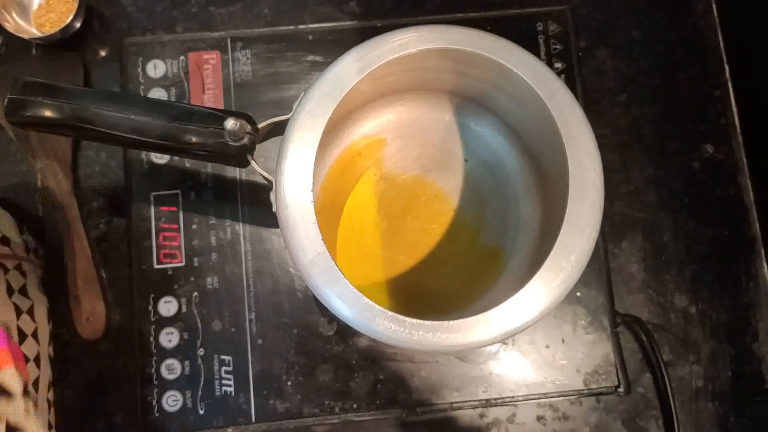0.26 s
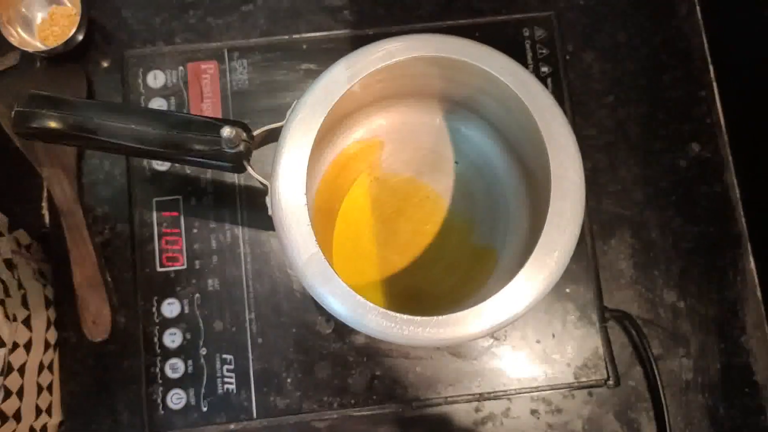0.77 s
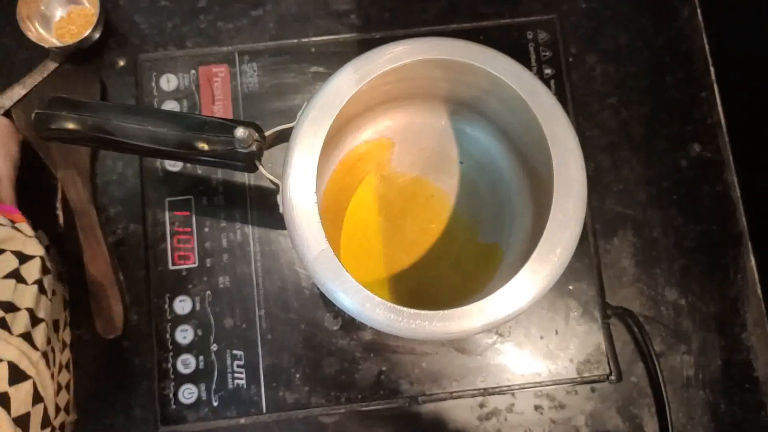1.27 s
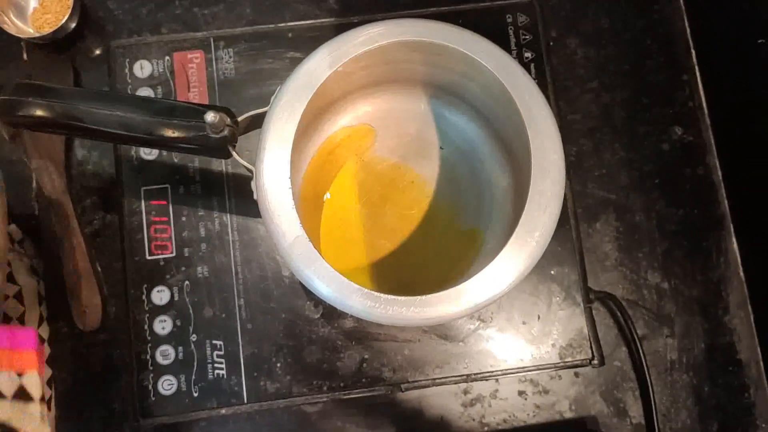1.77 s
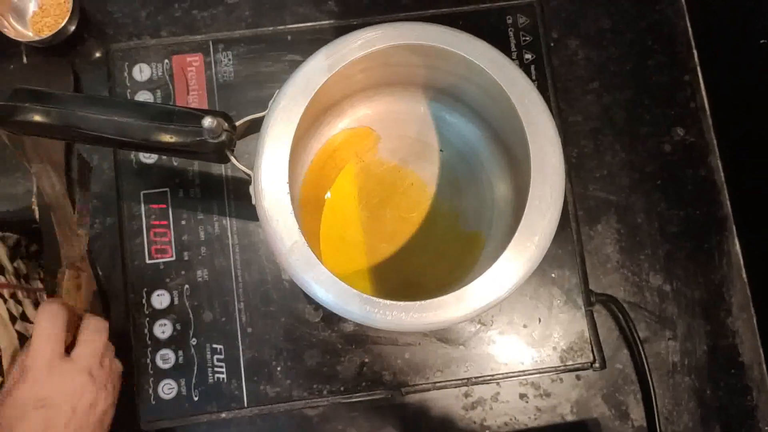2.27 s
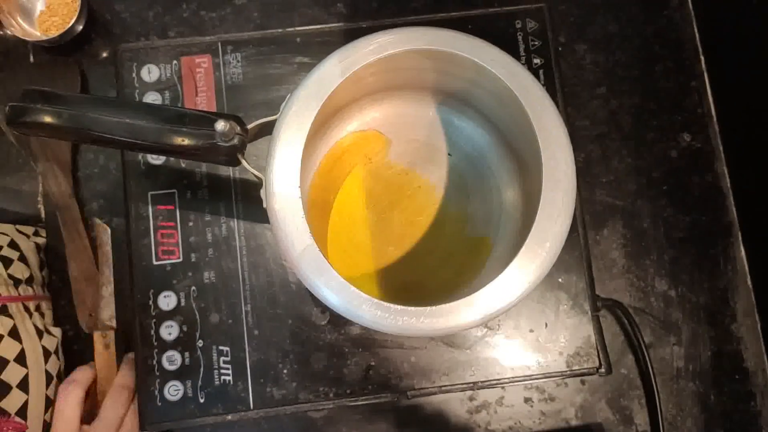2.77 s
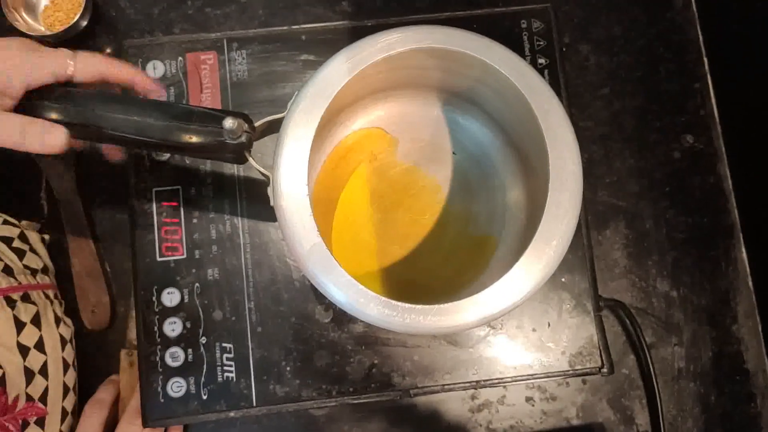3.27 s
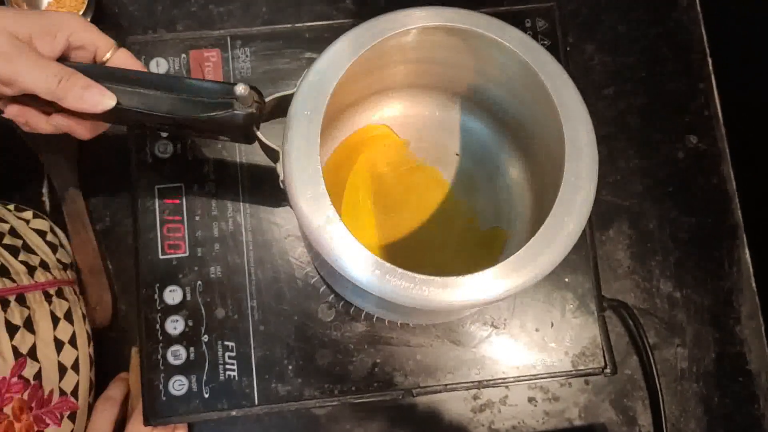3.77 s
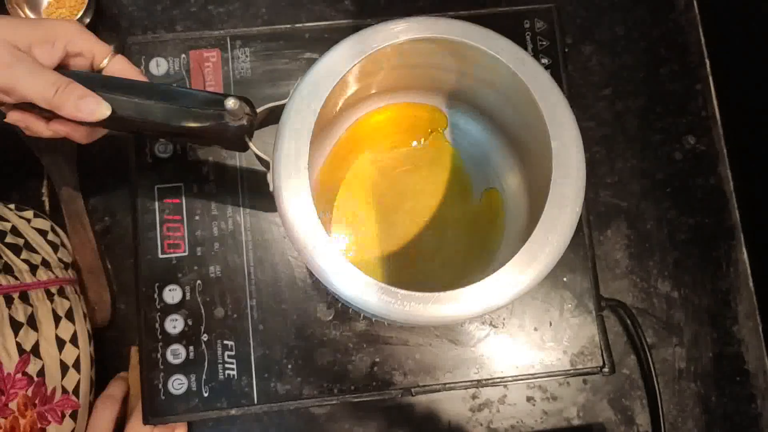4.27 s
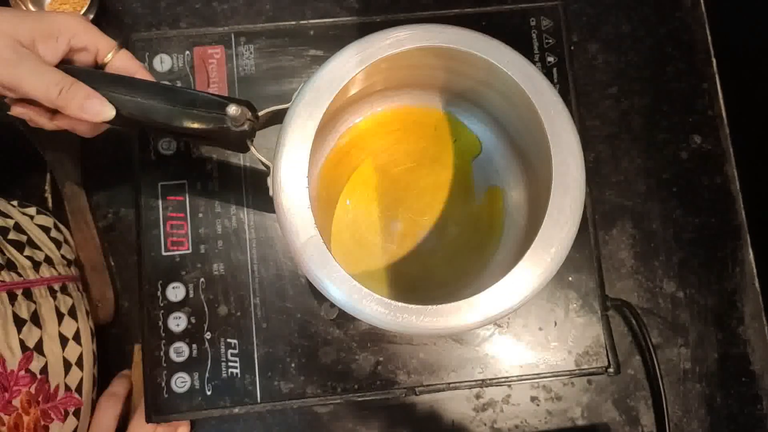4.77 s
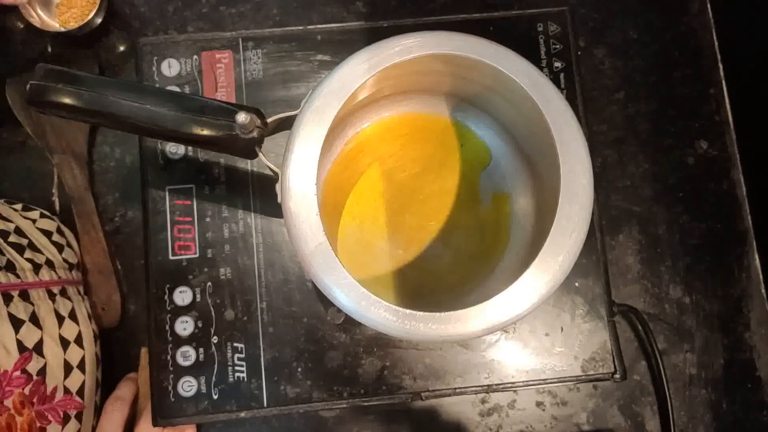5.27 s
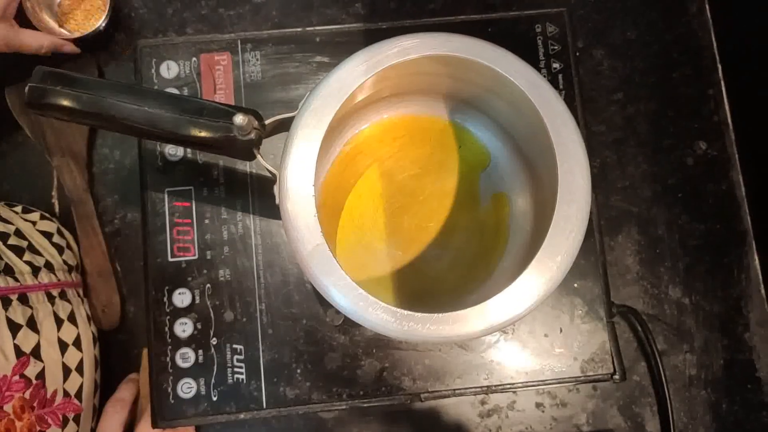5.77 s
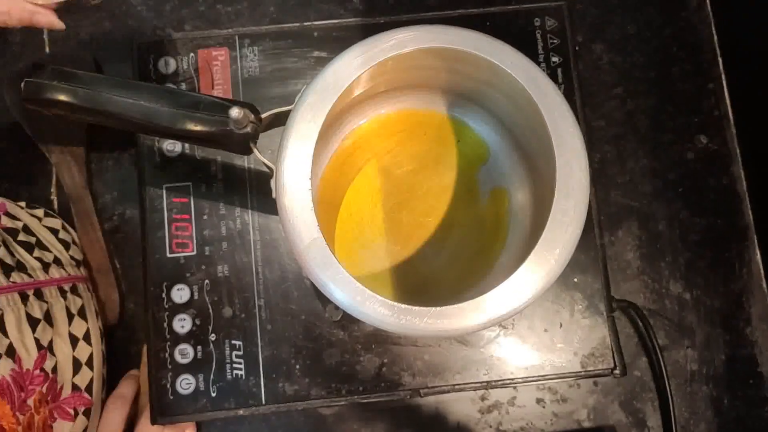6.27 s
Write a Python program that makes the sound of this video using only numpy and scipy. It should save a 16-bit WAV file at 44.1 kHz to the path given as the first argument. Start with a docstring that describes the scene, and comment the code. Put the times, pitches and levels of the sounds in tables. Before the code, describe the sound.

In a small kitchen, an induction cooktop's fan drones over a low electrical hum and a faint, high sizzle from a pressure cooker. A utensil scrapes and tinkles, something knocks hard on the counter, and a steel knife rattles. The cooker's handle clicks, then its base taps the glass. The sizzle drops out for a second and returns with another tap. Everything sounds close, with a short room echo.

```python
"""Pressure cooker on an induction cooktop

In a small kitchen a fan drones, the mains hum, and the coil shakes a cooker of oil into a fine sizzle.
Utensils clink and knock on the counter, and a knife is moved aside. A hand grips the cooker's handle
and tilts it; the sizzle all but stops until the base is set back on the glass."""
import sys
import numpy as np
from scipy import signal
from scipy.fft import rfft, irfft
from scipy.io import wavfile

SR = 44100
rng = np.random.default_rng(int(sys.argv[2]) if len(sys.argv) > 2 else 0)


def dump_mix(stems):
    """Bounce the given channels to the path in sys.argv[1] as a 16-bit WAV at rate SR."""
    frames = np.atleast_2d(stems).T  # one column per channel
    limited = np.clip(frames, -1, 1)  # hard clip at full scale
    pcm = np.round(limited * 32767).astype(np.int16)
    wavfile.write(sys.argv[1], SR, pcm)


N = 287973
TIME, FREQ = np.arange(N) / SR, np.fft.rfftfreq(N, 1 / SR)
MAINS_HZ = 50


def amp(db):
    """Turns decibels into a gain."""
    return 10 ** (np.asarray(db) / 20)


def unit(x):
    """Scales a signal to an average (rms) size of 1."""
    return x / np.sqrt(np.mean(x ** 2) + 1e-20)


def read(points, hz):
    """Looks up a table by frequency, with octaves evenly spaced."""
    f, value = np.transpose(points)
    return np.interp(np.log(hz + 1), np.log(f), value)


def curve(rows):
    """Joins (time, value) points with straight lines."""
    return np.interp(TIME, *np.transpose(rows))


def add(mix, s, sound):
    """Mixes a stereo sound in, starting at s seconds."""
    part = mix[:, round(s * SR):][:, :sound.shape[1]]
    part += sound[:, :part.shape[1]]


def pan(x, left_db):
    """Leans a sound to the left."""
    return x * amp([[left_db / 2], [-left_db / 2]])


def drift(rate_hz):
    """Random wandering, mostly slower than rate_hz."""
    return unit(irfft(rfft(rng.standard_normal(N)) / (1 + (FREQ / rate_hz) ** 2), N))


def bell(hz, width):
    """The bell-shaped peak of a resonance around hz."""
    return 1 / np.sqrt(1 + (2 * (FREQ - hz) / width) ** 2)


def colour(x, points, size=2048):
    """Shapes lows and highs; nothing rings ahead of a hit, so it stays sharp."""
    log_gain = np.log(amp(read(points, abs(np.fft.fftfreq(size, 1 / SR)))))
    taps = np.fft.ifft(np.exp(np.conj(signal.hilbert(log_gain)))).real
    return signal.oaconvolve(x, taps[None, :size // 2], axes=1)[:, :N]


def tone(turns, db, unsteady, flutter_hz=7):
    """A tone that flutters in level and pitch; turns counts its cycles."""
    flutter = 1 + unsteady * (drift(flutter_hz) + 1j * drift(flutter_hz)) / np.sqrt(2)
    return np.sqrt(2) * amp(db) * (flutter * np.exp(2j * np.pi * turns)).real


def reflections(depth_db, delay_s):
    """Nearby surfaces put peaks and dips in the treble, different left and right."""
    echoes = rng.standard_normal((2, N)) * np.exp(-TIME / delay_s)
    return amp(depth_db * unit(rfft(echoes).real) * np.minimum(FREQ / 2500, 1))


def kitchen(x, tail_db=-8, near_db=-6, near_s=0.011, build_s=0.012):
    """Sound bounces off counter and wall, then blurs into a short tail."""
    # how long the room rings: f/Hz, time to fade by 60 dB/s
    fade_times = [(150, 0.12), (700, 0.28), (2000, 0.51), (5000, 0.42), (12000, 0.29)]
    hz, t, bands = signal.stft(rng.standard_normal((2, SR // 2)), SR, nperseg=256)
    tail = signal.istft(bands * amp(-60 * t / read(fade_times, hz)[:, None]), SR)[1]
    t = np.arange(tail.shape[1]) / SR
    tail = tail * (1 - np.exp(-t / build_s))
    bounces = rng.standard_normal(tail.shape) * (rng.random(tail.shape) < .05)
    near = bounces * t * np.exp(-2 * t / near_s)
    echo = (amp(tail_db) * unit(tail) + amp(near_db) * unit(near)) / np.sqrt(len(t))
    return x + signal.fftconvolve(x, echo, axes=1)[:, :N]


def fan(gust_db=0.73):
    """The cooling fan's blades drone, and its swirling air rings the duct."""
    # how often a blade passes: t/s, f/Hz
    blade_rate = [(0.0, 286), (0.07, 281.7), (6.4, 282.1), (6.53, 283.5)]
    # blade tones: multiple of that rate, level/dB, unsteady share
    blade_tones = [(1, -43, 0.26), (2, -62, 0.68), (3, -69.5, 0.8), (4, -63.5, 0.32)]
    # rushing air: f/Hz, level/dB
    rush = [(8, -79), (21, -63.5), (33, -83), (62, -83.5), (90, -70), (130, -80.5), (235, -81.5),
            (330, -73), (450, -72.5), (525, -82.5), (800, -78.5), (1550, -82), (4000, -90.5), (9500, -101),
            (12500, -105.5)]
    # resonances of duct and case: f/Hz, width/Hz, boost/dB
    duct = [(271.3, 26, 7), (338, 35, 6), (414.3, 41, 4), (599, 37, 10), (741, 19, 7.5), (1012, 69, 8),
            (1104, 24, 4), (1348, 91, 10), (1894, 330, 4.5)]
    # how alike left and right are: f/Hz, likeness from -1 to 1
    likeness = [(60, 0.843), (350, 0.91), (600, 0.47), (1300, 0.03), (2500, 0.026), (6000, -0.082)]
    turns = np.cumsum(curve(blade_rate)) / SR
    blades = sum(tone(turns * round(k), db, unsteady) for k, db, unsteady in blade_tones)
    left, other = rfft(rng.standard_normal((2, N)))
    same = np.clip(read(likeness, FREQ), -1, 1)
    right = same * left + np.sqrt(1 - same ** 2) * other
    air_db = read(rush, FREQ) + sum(db * bell(hz, width) ** 2 for hz, width, db in duct)
    air = irfft(np.array([left, right]) * amp(air_db) * reflections(depth_db=1.0, delay_s=0.0074), N)
    return blades + air * np.sqrt(SR / 2) * amp(gust_db * drift(3.1))


def hum(deep_hz=49.3, deep_db=-55):
    """Low electrical hum; two close tones near twice the mains rate throb against each other."""
    # swells and sags of the deepest tone: middle t/s, half length/s, change/dB
    swells = [(2.72, 0.4, 6), (3.55, 0.28, 7.5), (4.75, 0.38, 4.5), (5.9, 0.13, -10)]
    # gap between the two close tones: t/s, f/Hz
    beat_rate = [(4.5, 3.79), (4.7, 4.17)]
    # faint higher tones: f/Hz, level/dB, unsteady share
    overtones = [(157.2, -69.5, 1), (187.5, -68, 0.89)]
    swell_db = sum(db * np.exp(-((TIME - s) / half) ** 2) for s, half, db in swells)
    deep = tone(deep_hz * TIME, deep_db + swell_db, unsteady=0.33, flutter_hz=3.5)
    turns, beats = 2 * MAINS_HZ * TIME, np.cumsum(curve(beat_rate)) / SR
    lower = tone(turns, db=-55.5, unsteady=0.1, flutter_hz=2.9)
    upper = tone(turns + beats, db=-58, unsteady=0.094, flutter_hz=1.8)
    faint = sum(tone(hz * TIME, db, unsteady, flutter_hz=5.1) for hz, db, unsteady in overtones)
    return deep + lower - upper + faint


def sizzle(lift_s=4.04, set_down_s=5.0, switch_s=0.04, lifted_db=-26,
           ripple=0.17, flicker_db=0.1, waver_db=2.8):
    """While the cooker is on the glass, the coil shakes its base into a hiss that pulses with the mains."""
    # hiss of the base: f/Hz, level/dB
    hiss_shape = [(2500, -120), (4200, -101), (6400, -104), (7000, -97.5), (7800, -97), (8500, -103),
                  (9900, -103), (10500, -102), (10850, -105), (12400, -108)]
    # its high resonances: f/Hz, width/Hz, level/dB, how strongly each follows the brightness
    resonances = [(7730, 550, -95.5, 0.19), (10500, 180, -100, 0.22), (11280, 350, -90.5, 0.9),
                  (11530, 300, -96, 1.1), (12320, 450, -88.5, 1.1)]
    # brightness, which dips for a while after the cooker is moved: t/s, level/dB
    brightness = [(3.5, 1), (3.9, -3), (5.2, -4.5), (5.6, -9), (5.95, -8), (6.35, 2)]
    noise = rfft(rng.standard_normal((2, 2, N))) * np.sqrt(SR / 2)
    shake = noise * reflections(depth_db=3.5, delay_s=0.0053)
    hiss = irfft(shake[0] * amp(read(hiss_shape, FREQ)), N)
    for hz, width, db, follow in resonances:
        level_db = db + follow * curve(brightness) + waver_db * drift(7.8)
        hiss += irfft(shake[1] * bell(hz, width) ** 2, N) * amp(level_db)
    lifted = np.clip(np.minimum(TIME - lift_s, set_down_s + switch_s - TIME) / switch_s, 0, 1)
    pulse = unit(1 - ripple + ripple * abs(np.sin(2 * np.pi * MAINS_HZ * TIME)))
    return hiss * pulse * amp(lifted_db * lifted + flicker_db * drift(25))


def slides(grain_db=3):
    """Utensils slide, the hand rubs the handle and a utensil gives a brief tick: grainy noise makes the steel
    sing."""
    # rubs, and one brief tick at 1.11 s: peak t/s, level/dB, rise/s, fall/s, ring/dB
    strokes = [(.868, -41, 0.017, 0.0089, -10), (.925, -44.5, 0.0093, 0.0084, -12),
               (1.11, -41.5, 0.0036, 0.0041, 0), (3.063, -43, 0.0059, 0.0044, -1.5),
               (3.079, -30.5, 0.0086, 0.015, -0.5), (3.38, -48.5, 0.074, 0.029, -20),
               (3.457, -38.5, 0.012, 0.03, -17), (3.6, -49.5, .06, 0.064, -15)]
    # friction noise: f/Hz, level/dB
    rub_shape = [(500, -7), (2000, -2.5), (4300, -1.5), (6500, 1.5), (8000, 2.5), (11000, 4.5), (12500, -4)]
    # resonances of the steel: f/Hz, width/Hz, level/dB
    resonances = [(5030, 130, 17.7), (7300, 130, 4), (7955, 140, 9.7), (9600, 170, 4.4), (10800, 140, 4.7)]
    grains = unit(rng.standard_normal((2, N)) * amp(grain_db * drift(500)))
    rub, sing = np.zeros((2, N))
    for s, db, rise, fall, ring_db in strokes:
        stroke = amp(db) * np.exp(-np.maximum((s - TIME) / rise, (TIME - s) / fall))
        rub += stroke
        sing += stroke * amp(ring_db)
    steel = sum(amp(db) / (1 + 2j * (FREQ - hz) / width) for hz, width, db in resonances)
    return colour(grains * rub, rub_shape) + irfft(rfft(grains * sing) * steel, N)


def strike(hits, crack, notes, pivot_hz=5000):
    """At each hit the surfaces chatter and the object rings; harder hits sound brighter."""
    t = TIME[:SR // 2]
    out = np.zeros((2, N))
    for s, db, chatter_s, hardness in hits:
        burst = rng.standard_normal((2, len(t))) * np.exp(-t / chatter_s)
        burst /= np.linalg.norm(burst, axis=1, keepdims=True)
        tilted = [(hz, level + hardness * np.log2(hz / pivot_hz)) for hz, level in crack]
        add(out, s, amp(db) * colour(burst, tilted))
        lag = rng.uniform(0, 0.00032, (2, 1))  # travel time to the left and right
        for k, (hz, note_db, fade_s) in enumerate(notes):
            level_db = db + note_db + hardness * np.log2(hz / pivot_hz) - 60 * t / fade_s
            ring = amp(level_db) * np.sin(2 * np.pi * hz * np.maximum(t - lag, 0))
            add(out, s, (-1) ** k * ring)  # opposite starts make close notes swell and throb
    return out


def utensil():
    """A light utensil is bumped and tinkles."""
    # bumps: t/s, level/dB, chatter/s, hardness/dB per octave
    hits = [(1.0195, -5.5, 0.0076, 4), (1.027, 0, 0.03, -0.5), (1.083, -16.5, .005, -6)]
    # noise of a bump: f/Hz, level/dB
    crack = [(500, -29), (1400, -2), (2200, -1), (3000, -12), (5000, -11), (7200, -18), (9000, -5),
             (10000, -5.5), (11000, -6), (12500, -11)]
    # the utensil's ring: f/Hz, level/dB, fade/s
    notes = [(3724, -38, 0.089), (5600, -46, 0.067), (8880, -28, 0.05), (9500, -37, .06),
             (10960, -40.5, 0.071)]
    return strike(hits, crack, notes)


def knife():
    """A steel knife rattles and rings as it is picked up."""
    # rattles: t/s, level/dB, chatter/s, hardness/dB per octave
    hits = [(2.6042, -3, 0.0062, -2), (2.6135, -1, 0.013, -3.5), (2.688, -18, 0.0061, -4.5),
            (2.823, -33, .008, 16.5), (2.872, -39, .008, 17)]
    # noise of a rattle: f/Hz, level/dB
    crack = [(200, -13.5), (450, -1.5), (900, -5.5), (1800, 5.5), (2800, 0.5), (3950, 5.5), (4400, 19),
             (4850, 1), (5500, -9.5), (7200, -6.5), (8350, 9.5), (10000, -9), (12500, -8)]
    # the knife's ring: f/Hz, level/dB, fade/s
    notes = [(4248, -32, .11), (4290, -22.5, 0.076), (4420, -27, 0.087), (8140, -35, .12),
             (8355, -30.5, 0.14), (8640, -39, 0.09)]
    return strike(hits, crack, notes)


def counter_knock():
    """A hard knock on the counter rings briefly."""
    # contacts: t/s, level/dB, chatter/s, hardness/dB per octave
    hits = [(2.0386, 2.5, 0.002, 1), (2.042, -2, 0.0046, 0.5), (2.089, -27, 0.0073, -3.5)]
    # noise of the knock: f/Hz, level/dB
    crack = [(120, -15), (250, 4), (420, 8), (620, 10.5), (850, 13.5), (1150, 8), (1500, -1), (2000, 2),
             (2750, 13), (4500, 9), (7500, 7.5), (8400, 5), (9700, 13.5), (12500, 1)]
    # its ring: f/Hz, level/dB, fade/s
    notes = [(369, -18.5, 0.037), (416, -16, 0.073), (742, -18.5, 0.095), (2980, -32, 0.079),
             (3510, -30, .09), (3880, -30, 0.06), (4974, -38, 0.091), (6280, -27.5, 0.041),
             (7160, -31.5, 0.106), (9300, -33, .04)]
    return strike(hits, crack, notes)


def handle_clicks():
    """The cooker's handle clicks in the hand."""
    # clicks: t/s, level/dB, chatter/s, hardness/dB per octave
    hits = [(3.397, 2, 0.0065, 1.5), (3.458, -2.5, .002, 1.5), (4.67, -17.5, 0.0029, 3.7)]
    # noise of a click: f/Hz, level/dB
    crack = [(700, -27), (2000, -3), (3500, -11), (5500, -10), (7500, -9), (9000, -8), (10000, -9),
             (12500, -12)]
    # the handle's ring: f/Hz, level/dB, fade/s
    notes = [(5250, -41, 0.044), (7500, -40, .04), (9880, -46, .04)]
    return strike(hits, crack, notes)


def base_taps():
    """The cooker's base taps the glass as it is tilted and set down."""
    # taps: t/s, level/dB, chatter/s, hardness/dB per octave
    hits = [(4.024, -5, .009, -1.5), (5.015, -2, 0.0068, 0.77), (5.08, -17, .003, 0)]
    # noise of a tap: f/Hz, level/dB
    crack = [(700, -36), (2300, -19), (3700, -6), (5500, -12), (7500, -3.5), (9300, -15), (11300, -7),
             (12500, -6)]
    # its ring: f/Hz, level/dB, fade/s
    notes = [(3754, -40, .05), (4090, -41, .05), (7520, -43, 0.083)]
    return strike(hits, crack, notes)


def scene():
    """The running cooktop, with the handling sounds echoing around it."""
    cooktop = pan(fan() + hum(), 1.22) + pan(sizzle(), 1.3)
    knock = pan(counter_knock(), 0.58)
    rattle = pan(knife(), 2.1)
    tinkle = utensil()
    cooker = pan(handle_clicks() + base_taps(), 1)
    nearby = kitchen(knock + tinkle + cooker + slides())
    # the knife lies off to the side, so more of it arrives as echoes
    return cooktop + nearby + kitchen(rattle, tail_db=-5.5, near_db=-0.5)


def record(dry, top_hz=12480):
    """Clips at full scale, then cuts the treble above top_hz."""
    taps = signal.firwin(601, top_hz, window=("kaiser", 8), fs=SR)
    return signal.oaconvolve(np.clip(dry, -1, 1), taps[None], "same")


dry = scene()
out = record(dry)
dump_mix(out)
```